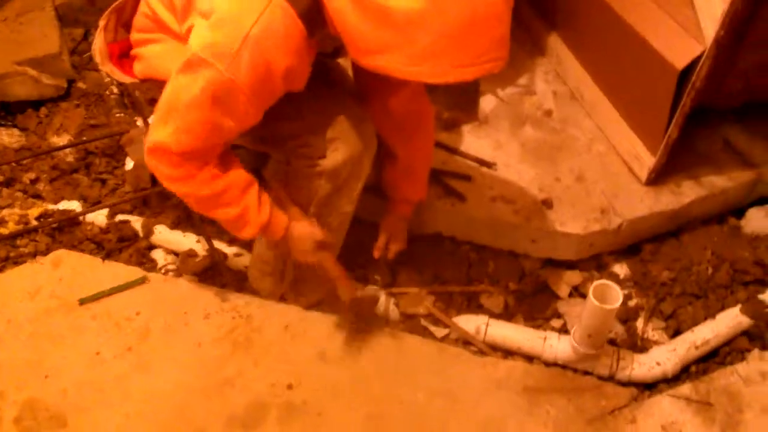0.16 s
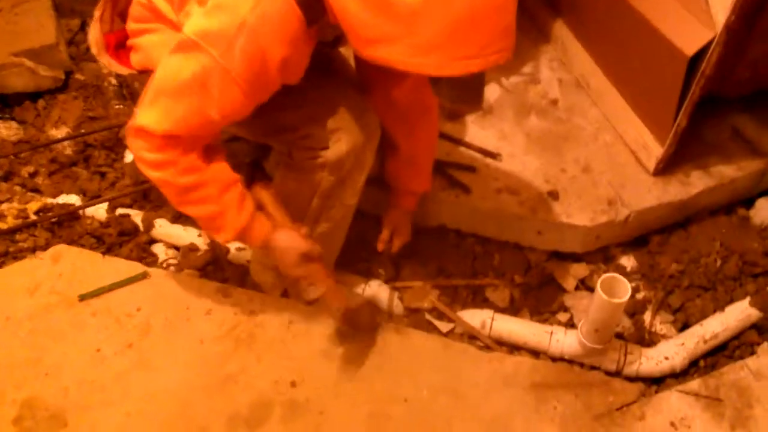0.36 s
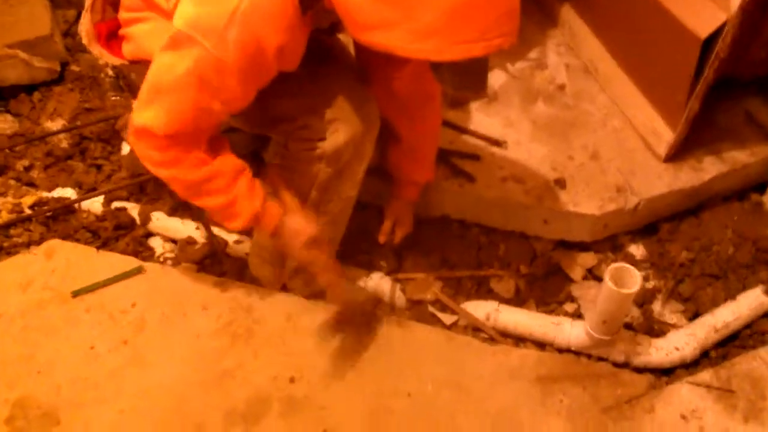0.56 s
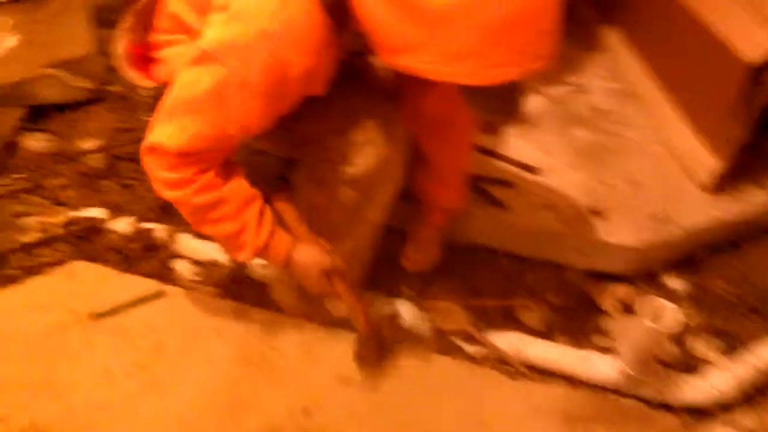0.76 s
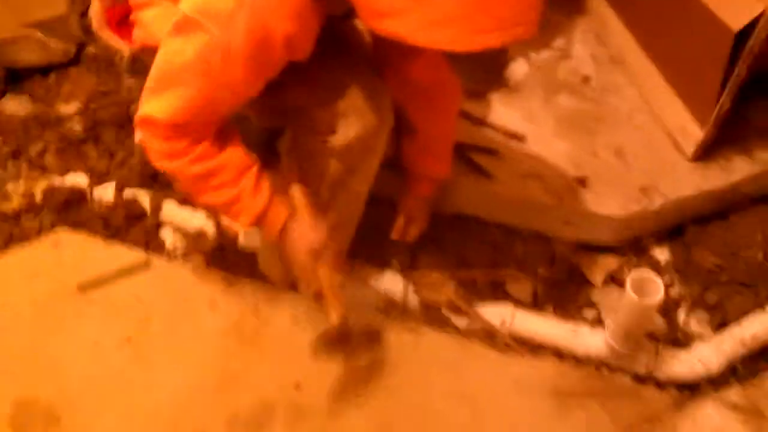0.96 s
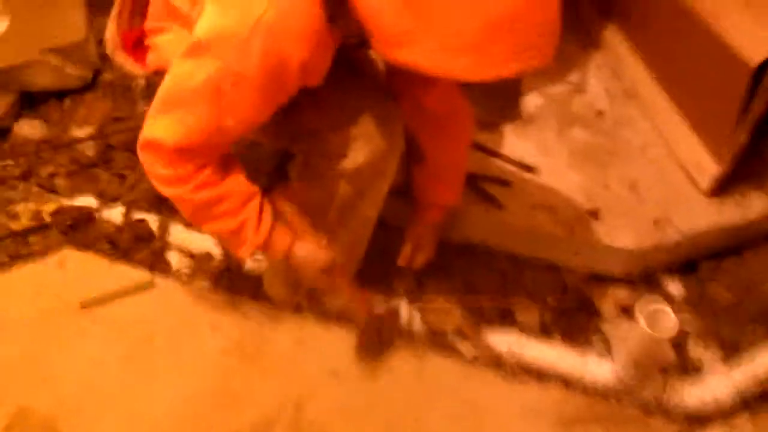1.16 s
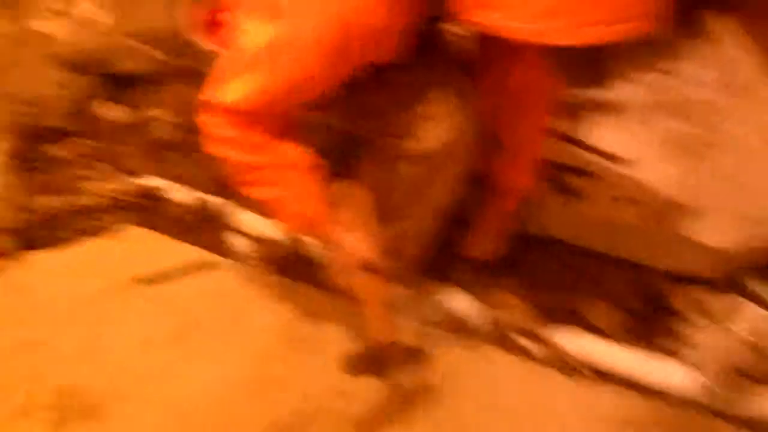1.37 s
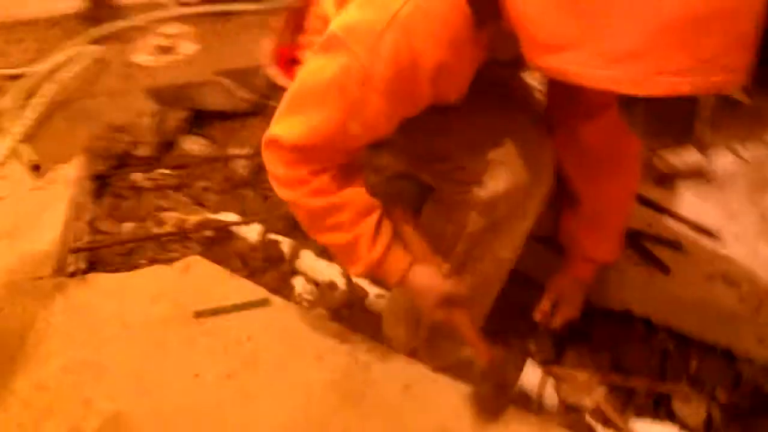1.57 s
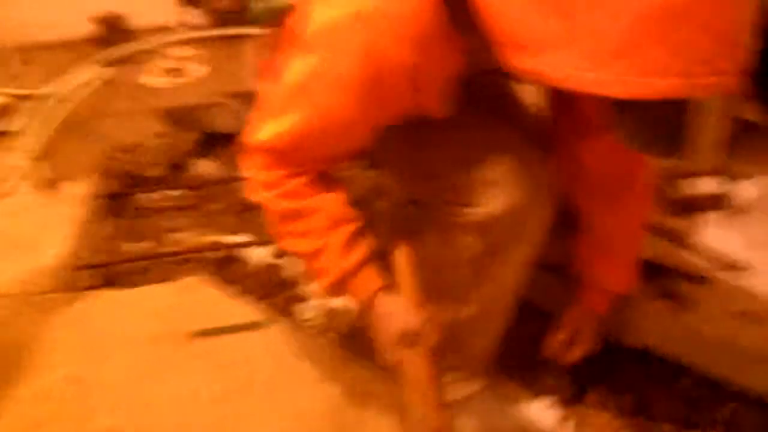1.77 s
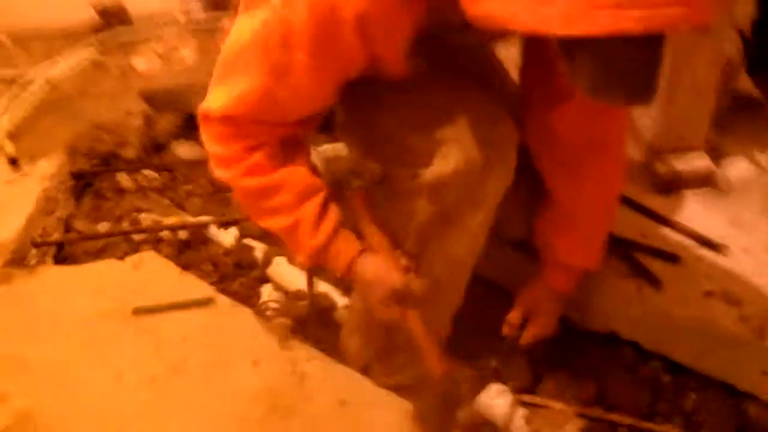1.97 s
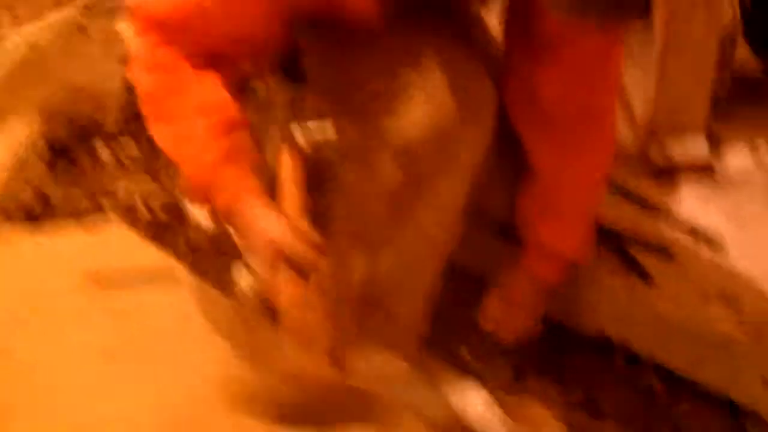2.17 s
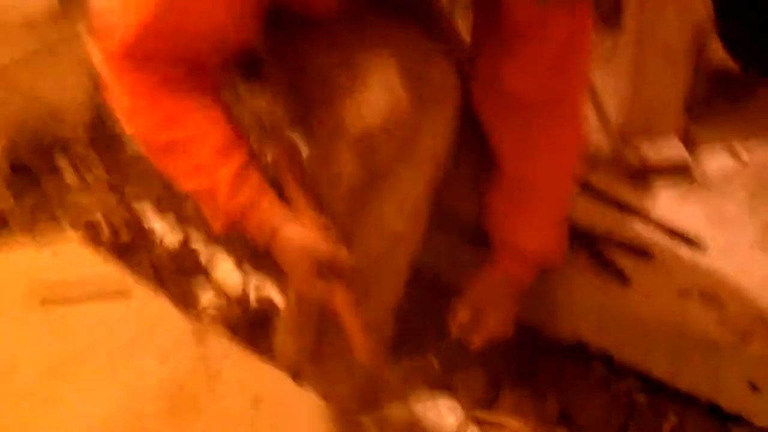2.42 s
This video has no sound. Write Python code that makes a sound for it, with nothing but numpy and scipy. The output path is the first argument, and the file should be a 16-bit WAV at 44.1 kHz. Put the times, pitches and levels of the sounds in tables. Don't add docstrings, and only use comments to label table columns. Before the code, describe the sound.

Hammer blows on steel rods in concrete, sharp metallic clanks with thuds, gravel scuffing between

```python
import sys
import numpy as np
from scipy import signal
from scipy.io import wavfile

SR = 44100
rng = np.random.default_rng(int(sys.argv[2]) if len(sys.argv) > 2 else 0)


def field_ratio(decibels):
    return 10 ** (np.asarray(decibels, dtype=float) / 20)


def transcribe(u):
    v = np.clip(np.atleast_2d(u).T, -1, 1)
    q = np.round(v * 32767).astype(np.int16)
    wavfile.write(sys.argv[1], SR, q)


N = 108045
TREBLE_HZ = 6000


def at_hz(points, hz):
    table = np.array(points)
    return np.interp(np.log(hz), np.log(table[:, 0]), table[:, 1])


def rms_one(x):
    return x / np.sqrt(np.mean(x ** 2) + 1e-20)


def ring(clicks, hz, t60_s):
    r, w = field_ratio(-60 / (t60_s * SR)), 2 * np.pi * hz / SR
    return signal.lfilter([0, np.sin(w)], [1, -2 * r * np.cos(w), r * r], clicks + 1e-18)


def bandpass(x, low_hz, high_hz):
    return signal.sosfilt(signal.butter(2, [low_hz, high_hz], "band", fs=SR, output="sos"), x)


def pan(pan_db):
    return field_ratio(np.array([[pan_db / 2], [-pan_db / 2]]))


def add(out, sound, s):
    i = int(s * SR)
    sound = sound[:, max(-i, 0):N - i]
    out[:, max(i, 0):max(i, 0) + sound.shape[1]] += sound


# frequency in Hz, left-right likeness (0 to 1).
LIKENESS = [(60, 0.99), (200, 0.97), (500, 0.87), (1000, 0.02), (5000, 0.053), (14000, 0.033)]
# frequency in Hz, left-right level in dB.
LEAN = [(60, -0.5), (110, -0.5), (200, 1.5), (370, 0.5), (680, 1.0), (1250, 0), (2280, -4.5), (4190, -3.5),
        (7690, -2.5), (14100, -6)]
EDGES_HZ = 30 * 2 ** np.arange(0, 9.1, 1 / 3)


def bands(sources, gain):
    out = 0
    for k, (low, high) in enumerate(zip(EDGES_HZ, EDGES_HZ[1:])):
        mid, side = bandpass(sources[k % 2], low, high)
        hz = np.sqrt(low * high)
        alike, lean = np.clip(at_hz(LIKENESS, hz), -1, 1), field_ratio(at_hz(LEAN, hz) / 2)
        a, b = np.sqrt(1 + alike) * mid, np.sqrt(1 - alike) * side
        out = out + gain(hz) * np.array([(a + b) * lean, (a - b) / lean])
    return out


def suppression_db(t):
    wait_s, db_per_s = 0.18, 120
    return -db_per_s * np.maximum(t - wait_s, 0)


# frequency in Hz, t60 in seconds.
ROOM_T60 = [(60, 1.64), (250, 1.19), (700, 0.7747), (2000, 0.5), (5000, 0.5182), (9000, 0.37),
            (14000, 0.22)]
# frequency in Hz, time constant in seconds.
ROOM_RISE = [(60, 0.082), (250, 0.0083), (1000, 0.0054), (5000, 0.00059)]
# frequency in Hz, level in dB.
ROOM_COLOUR = [(40, -5), (100, -1.5), (400, -3.5), (900, -1.5), (1500, -11), (3000, -3.5), (6000, -3),
               (14000, 4.5)]


def room(count):
    early_db, early_t60_s = 9.5, 0.018
    t = np.arange(SR // 2) / SR
    early = 1 + field_ratio(early_db - 60 * t / early_t60_s)

    def shape(hz):
        decay = field_ratio(at_hz(ROOM_COLOUR, hz) - 60 * t / at_hz(ROOM_T60, hz) + suppression_db(t))
        rise = 1 - np.exp(-t / max(at_hz(ROOM_RISE, hz), 1e-4))
        return np.tile(decay * rise, 2)

    white = rng.standard_normal((2, 2, count, SR))
    return early * bands(white, shape)[..., SR // 2:] / np.sqrt(SR / 20)


# frequency in Hz, density in dB per Hz.
SITE_NOISE = [(30, -15), (80, -10), (170, 0), (500, -13), (1500, -19.5), (3000, -21.5), (6000, -26.5),
              (14000, -27.5)]


def site_noise():
    white = rng.standard_normal((2, 2, N))
    return field_ratio(-60) * rms_one(bands(white, lambda hz: field_ratio(at_hz(SITE_NOISE, hz))))


# time in seconds, level in dB.
RUMBLE = [(0.0, -78), (0.27, -57.5), (0.39, -59), (0.47, -52), (0.74, -54.5), (0.88, -64), (1.1, -66),
          (1.26, -45), (1.55, -52), (1.67, -51.5), (1.8, -44), (2.02, -49), (2.16, -44), (2.3, -39.5),
          (2.45, -56)]


def handling_rumble():
    rumble_hz, t60_s = 92.5, 0.045
    s, db = np.transpose(RUMBLE)
    low = rms_one(ring(rng.standard_normal(N), rumble_hz, t60_s))
    return field_ratio(np.interp(np.arange(N) / SR, s, db) - 4) * low


# start in seconds, length in seconds.
SLIDES = [(0.0, .06), (.155, .06), (.385, .06), (.443, .23), (.88, .1), (1.0, .08), (1.265, .05),
          (1.31, .16), (1.475, .05), (1.735, .045), (1.79, .08), (1.86, .08), (1.93, .04), (2.2, .24),
          (2.42, .06)]
# level in dB, left-right in dB, treble in dB.
SCUFFS = [(-62.5, 5, 7.5), (-54.5, -6, 2), (-40, -10, -2), (-24.5, -10.5, -4.5), (-64.5, 9, 13),
          (-59, 5, 10), (-37, -1, 3), (-47.5, -1.5, 10.5), (-47.5, -7, 8), (-40.5, -4, -11), (-51, -1.5, 7),
          (-41.5, -0.5, 5), (-61.5, 5, 5), (-56, 2.5, 10.5), (-46, -4.5, -11)]
# frequency in Hz, density in dB per Hz.
GRAVEL = [(200, -35.5), (570, -8), (1300, -11), (1950, -7), (3000, -11.5), (4800, -12.5), (6200, -27),
          (14000, -22)]


def scuffs():
    rise_s, sag_db = .045, 5
    grains_per_s, grain_spread_db = 4000, 3.44
    clumps_per_s, clump_db = 120, 1.2
    t, body, treble = np.arange(N) / SR, np.zeros((2, N)), np.zeros((2, N))
    for (s, length_s), (db, pan_db, treble_db) in zip(SLIDES, SCUFFS):
        x = (t - s) / max(length_s, .035)
        rise = np.clip((t - s) / min(rise_s, length_s / 3), 0, 1) ** 2
        fall = field_ratio(-sag_db * x - 31 * np.maximum(x - 1, 0))
        level = field_ratio(db) * rise * fall * pan(pan_db)
        body, treble = body + level, treble + field_ratio(treble_db) * level
    size = (2, 2, N)
    hits = rng.random(size) < grains_per_s / SR
    sizes = field_ratio(grain_spread_db * np.minimum(rng.exponential(1, size), 4))
    grains = hits * sizes * rng.choice([-1, 1], size)
    gravel = rms_one(bands(grains, lambda hz: field_ratio(at_hz(GRAVEL, hz))))
    low = signal.sosfiltfilt(signal.butter(6, TREBLE_HZ, fs=SR, output="sos"), gravel)
    steps = rng.standard_normal(int(N / SR * 200))
    clumps = field_ratio(clump_db * np.interp(t * clumps_per_s, np.arange(len(steps)), steps))
    return clumps * (body * low + treble * (gravel - low))


# time in seconds, level in dB, pitch in Hz, left-right in dB, room in dB.
KNOCKS = [(1.518, -18.5, 1620, 5, 12), (2.087, -7, 930, 10.5, -18.5), (2.053, -19.5, 1940, 17, 9),
          (2.342, -47, 1300, 3, -13), (0.64, -16.5, 1600, -14, -23), (1.758, -26, 2100, -6, 1),
          (1.9, -36, 880, -3, -4), (1.52, -23, 350, 2.5, 0.5), (1.744, -28, 4500, 2, 0),
          (1.877, -29, 2000, 0, 8), (1.887, -31, 3900, 1.5, 4), (.513, -30, 1500, -11, -11),
          (1.521, -16.5, 5000, -10, 12.5)]


def knocks(rooms):
    cycles, click_db = 5.8, -5
    out, click = np.zeros((2, N)), signal.unit_impulse(SR // 20)
    for s, db, hz, pan_db, room_db in KNOCKS:
        touch = bandpass(click, .7 * hz, min(4.4 * hz, .4 * SR))
        knock = ring(touch, hz, cycles / hz)
        knock = knock + field_ratio(click_db) * ring(touch, 2.49 * hz, cycles / hz / 2)
        knock = knock / np.abs(knock).max()
        add(out, field_ratio(db) * knock * pan(pan_db), s)
        add(out, field_ratio(db + room_db) * signal.fftconvolve(rooms[:, 0], knock[None], axes=1), s)
    return out


# frequency in Hz, level in dB, t60 in seconds.
SLAB = [(96.64, 3, 0.39), (175, 7.5, 0.11), (358.3, 8, 0.019), (656, 16.5, 0.015)]


def slab_thud(click, thud_db):
    return sum(field_ratio(db + thud_db - 36.5) * ring(click, hz, t60_s) for hz, db, t60_s in SLAB)


# frequency in Hz, level in dB, t60 in seconds.
ROD = [(3980, -5, 0.0055), (4394, -1, 0.0056), (5035, -1, 0.0034), (5565, 2.5, 0.004), (7150, -8.5, 0.0033),
       (8456, 0.5, 0.0047), (9550, -9, 0.0048), (12410, -1, 0.0027), (13430, -4, 0.0019),
       (10830, -20, 0.0032)]


def rod_ring(click, ring_db, free_hz):
    free_end_db, free_end_t60_s, strike_spread_db = -5, 0.011, 1.5
    out = field_ratio(free_end_db) * ring(click, free_hz, free_end_t60_s)
    spread_db = strike_spread_db * rng.standard_normal(len(ROD))
    for (hz, db, t60_s), d in zip(ROD, spread_db):
        out = out + field_ratio(db + d - 2 + ring_db * (hz > TREBLE_HZ)) * ring(click, hz, t60_s)
    return out


def head_ring(click, ring_db):
    t60_s, twin_db = .2, -11
    pair = ring(click, 7990, t60_s) + field_ratio(twin_db) * ring(click, 8012, t60_s / 2)
    return field_ratio(ring_db + suppression_db(np.arange(len(click)) / SR)) * pair


# time in seconds, strength in dB, slab thud in dB, treble ring in dB, free end mode in Hz.
BLOWS = [
    (-.23, -9.5, 2.5, -13, 4870),
    (.2103, -13, -26, -1, 4960),
    (.6405, -13, -0.5, 0.5, 4680),
    (1.0805, -12.5, 2.5, 1, 5340),
    (1.5355, -13.5, 5, 2.5, 5200),
    (1.9925, -12.5, 6, 1.5, 4850),
]


def hammer(rooms):
    crack_db, direct_db = 11, -24.5
    head_db, head_room_db = -47, -25
    lead_s, lead_db = 0.0042, -27
    out, click = np.zeros((2, N)), signal.unit_impulse(SR // 2)
    for k, (s, db, thud_db, ring_db, free_hz) in enumerate(BLOWS):
        blow = field_ratio(crack_db) * click + rod_ring(click, ring_db, free_hz) + slab_thud(click, thud_db)
        head = head_ring(click, ring_db)
        into_room = blow + field_ratio(head_room_db) * head
        wet = signal.fftconvolve(rooms[:, k], into_room[None], axes=1)[:, :SR // 2]
        direct = field_ratio(direct_db) * blow + field_ratio(head_db) * head * [[.8], [1]]
        add(out, field_ratio(db + 13.5) * (wet + direct), s)
        add(out, field_ratio(db + 12.5 + lead_db) * wet[:, :int(lead_s * SR)], s - lead_s)
    return out


def scene():
    rooms = room(count=len(BLOWS))
    return site_noise() + handling_rumble() + scuffs() + knocks(rooms) + hammer(rooms)


# frequency in Hz, width in Hz, gain in dB.
PORTS = [(4980, 1680, 6.5), (6300, 320, 0.5), (11450, 1700, 0)]


def microphone_ports(x):
    for hz, width_hz, db in PORTS:
        w, g = 2 * np.pi * hz / SR, field_ratio(db / 2)
        a = np.sin(w) * width_hz / hz / 2
        x = signal.lfilter([1 + a * g, -2 * np.cos(w), 1 - a * g], [1 + a / g, -2 * np.cos(w), 1 - a / g], x)
    return x


def band_limit(x):
    return signal.sosfilt(signal.butter(12, 14700, fs=SR, output="sos"), x)


def record(dry):
    low_cut_hz, top_cut_hz, clip_top = 55, 14700, 1.04
    x = signal.sosfilt(signal.butter(3, low_cut_hz, "high", fs=SR, output="sos"), dry)
    x = microphone_ports(x)
    x = clip_top * np.tanh(x / clip_top)
    x = signal.sosfilt(signal.cheby2(10, 50, top_cut_hz, fs=SR, output="sos"), x)
    return band_limit(np.clip(x, -1, 1))


dry = scene()
out = record(dry)
transcribe(out)
```